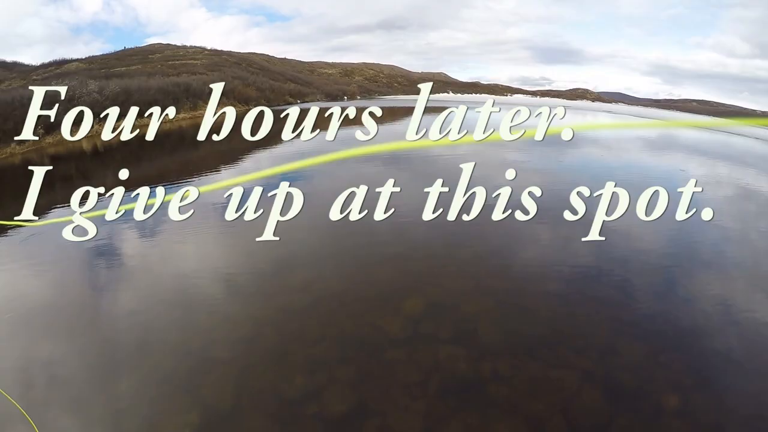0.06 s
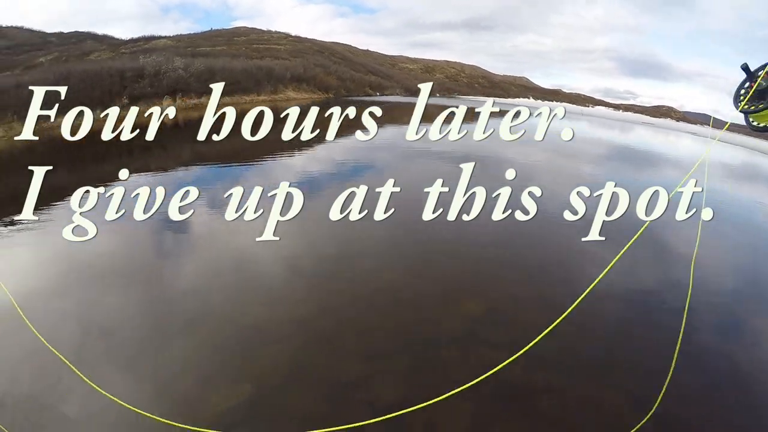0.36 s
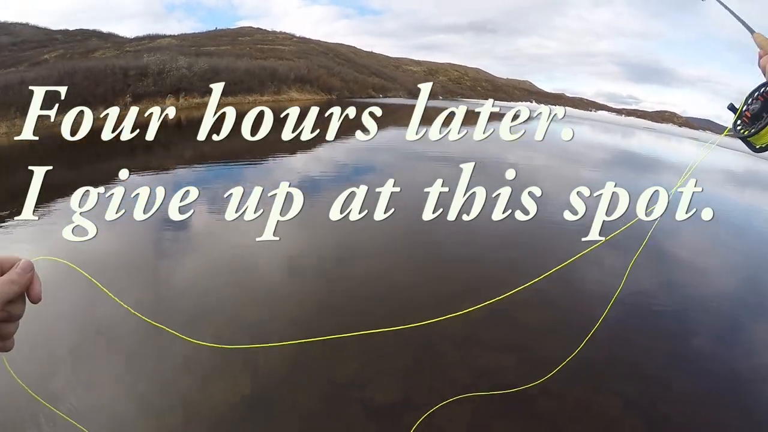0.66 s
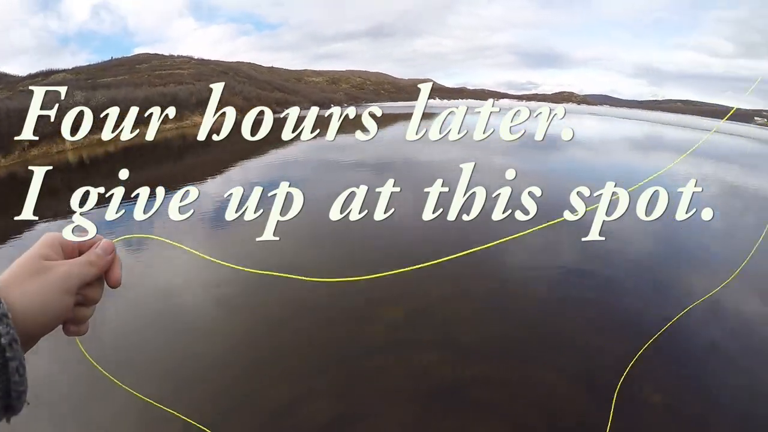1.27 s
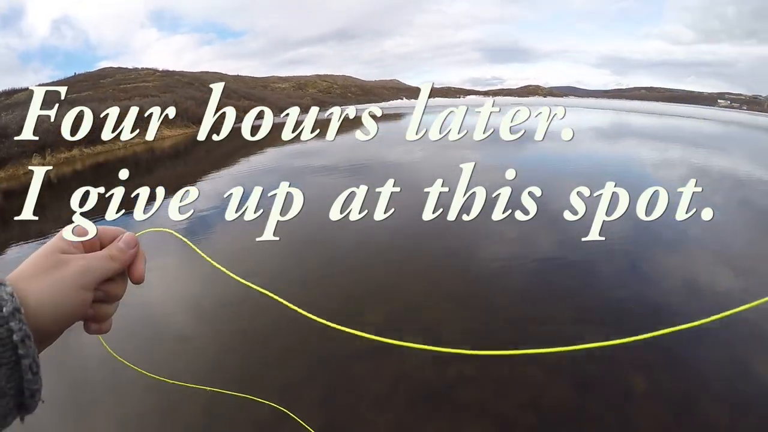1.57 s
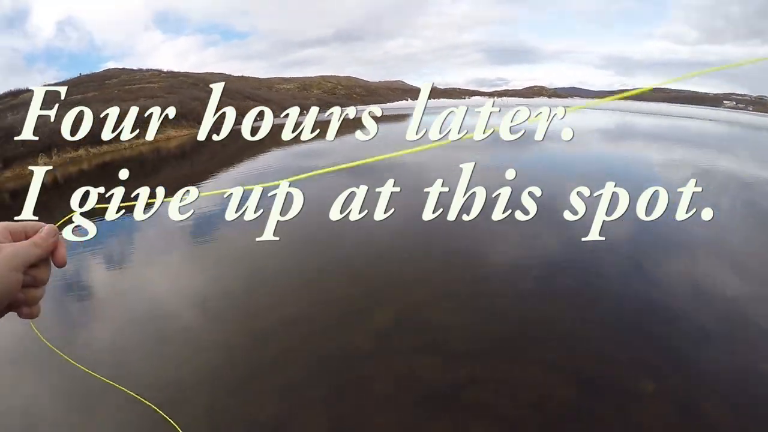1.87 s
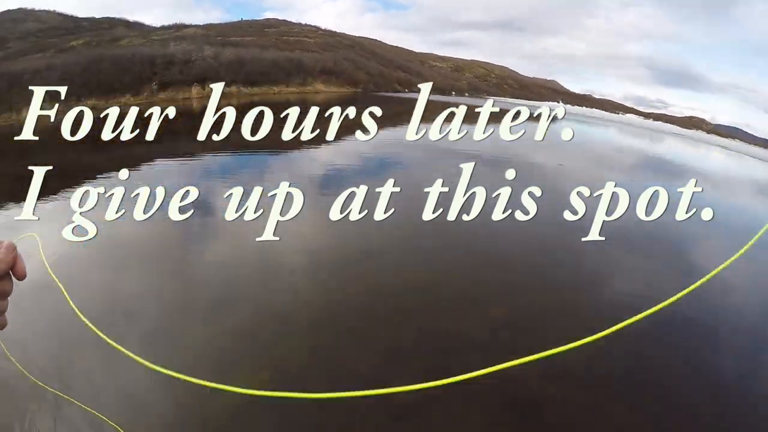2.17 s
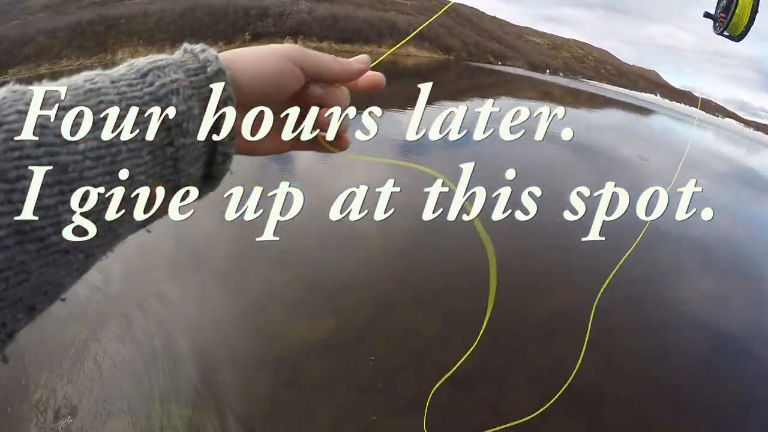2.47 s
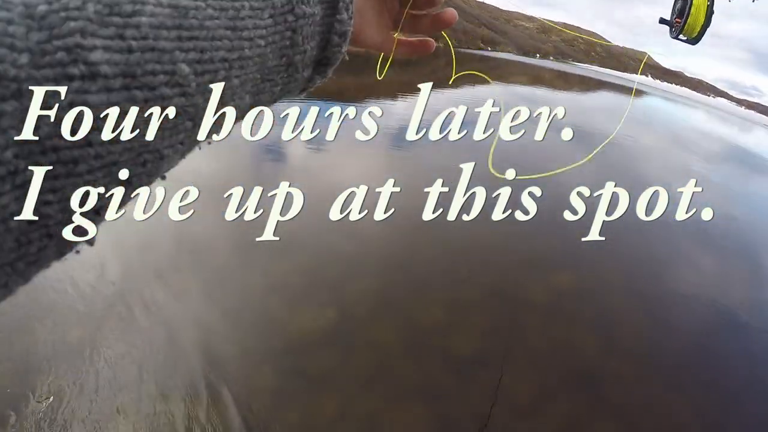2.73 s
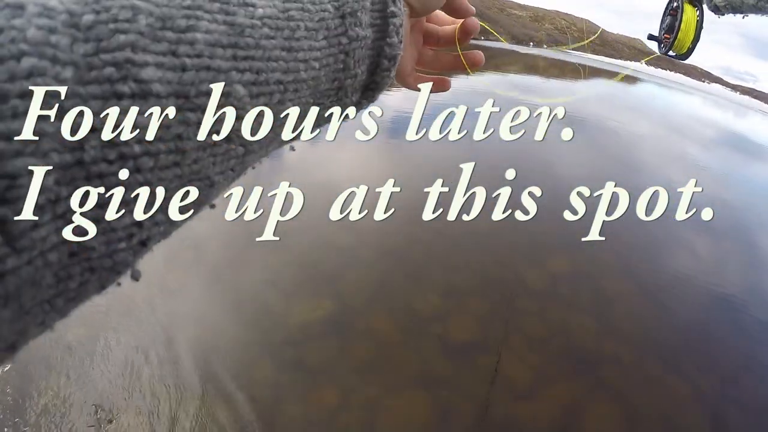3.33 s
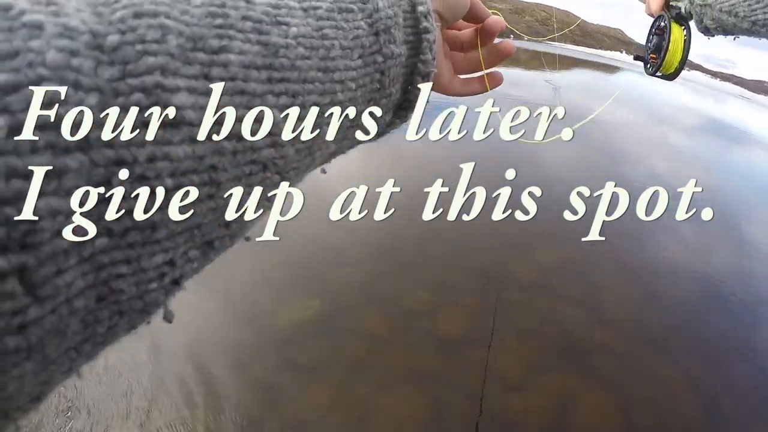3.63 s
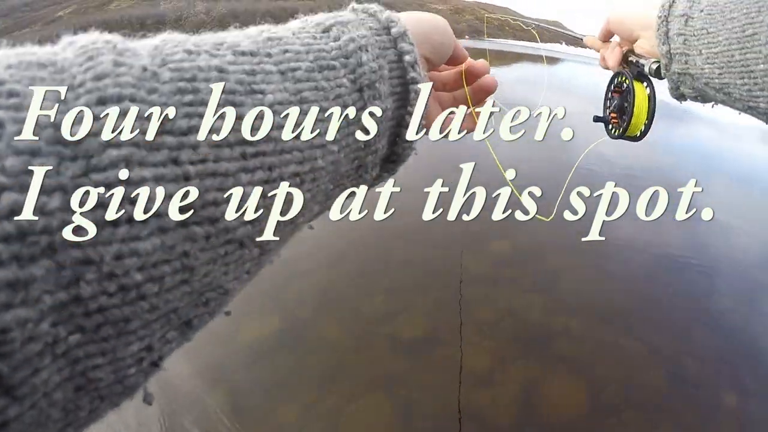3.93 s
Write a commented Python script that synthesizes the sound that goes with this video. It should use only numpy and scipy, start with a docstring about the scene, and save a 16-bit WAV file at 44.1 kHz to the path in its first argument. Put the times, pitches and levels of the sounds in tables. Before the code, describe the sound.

A fly fishing line is cast close by, over gusty wind rumble on the microphone. It slaps the rod at 0.2 seconds, the reel clicks at 0.6, and soft swishes lead to ticking through the rod rings around 1.5. At 2.3 comes a swish and the sharpest slap, then the line hisses out. A wool sleeve rustles from about 2.7, with faint water plops near 3.5.

```python
"""Fly cast on a lake shore

Heard from the angler's chest. The line swishes and sings in the air, is hauled ticking through the rod
rings, slaps the rod as it is let go and shoots out hissing; a woollen sleeve rustles. Wind buffets the
microphone, water plops and a far bird whistles. The left channel is almost dead."""
import sys
import numpy as np
from scipy import signal
from scipy.fft import rfft, irfft
from scipy.io import wavfile
from scipy.ndimage import uniform_filter1d

SR = 44100
rng = np.random.default_rng(int(sys.argv[2]) if len(sys.argv) > 2 else 0)


def generate_wav(sig):
    """Save sig (samples, or channels by samples) to the path in sys.argv[1] as 16-bit PCM at SR."""
    pcm = np.round(np.clip(np.atleast_2d(sig).T, -1, 1) * 32767).astype(np.int16)
    wavfile.write(sys.argv[1], SR, pcm)


N = 176400
T = np.arange(N) / SR
AGE = T[:SR // 10]  # time since an impact


def from_db(db):
    """Decibels to gain."""
    return 10 ** (np.asarray(db) / 20)


def unit_rms(x):
    """Scale to unit power."""
    return x / np.sqrt(np.mean(x ** 2) + 1e-20)


def level(curve, column=1):
    """Gain over time from one dB column of a curve."""
    curve = np.array(curve)
    return from_db(np.interp(T, curve[:, 0], curve[:, column]))


def colour(x, spectrum):
    """Shape a steady signal's spectrum; unit power."""
    hz, db = np.transpose(spectrum)
    bins_hz = np.fft.rfftfreq(N, 1 / SR) + 1e-3
    low_cut = 1 / np.sqrt(1 + (hz[0] / 2 / bins_hz) ** 4)
    gain = from_db(np.interp(np.log(bins_hz), np.log(hz), db))
    return unit_rms(irfft(rfft(x) * low_cut * gain, N))


def noise(spectrum):
    """Coloured noise; unit power."""
    return colour(rng.standard_normal(N), spectrum)


def wander(cutoff_hz):
    """Low-passed random drift; unit power."""
    return unit_rms(signal.sosfilt(signal.butter(2, cutoff_hz, fs=SR, output="sos"), rng.standard_normal(N)))


def swell(peak_s, rise_s, fall_s):
    """Gaussian envelope, separate widths before and after the peak."""
    return np.exp(-((T - peak_s) / np.where(T < peak_s, rise_s, fall_s)) ** 2 / 2)


def mode(hz, t60_s):
    """A struck, decaying resonance."""
    return np.sin(2 * np.pi * hz * AGE) * from_db(-60 * AGE / t60_s)


def glide(length_s, start_hz, hz_per_s):
    """Soft-edged tone with a linear pitch slide."""
    age = T[:int(length_s * SR)]
    return np.sin(2 * np.pi * (start_hz + hz_per_s * age / 2) * age) * signal.windows.tukey(len(age), .5)


def add(out, start_s, sound):
    """Mix a short sound in place."""
    i = int(start_s * SR)
    out[i:i + len(sound)] += sound[:N - i]


def grains(per_s, spread_db):
    """Random clicks of uneven size."""
    clicks = (rng.random(N) < per_s / SR) * rng.choice([-1, 1], N)
    return clicks * from_db(spread_db * np.minimum(rng.exponential(1, N), 3))


def friction(spectrum):
    """Stick-slip grains over a smooth hiss."""
    stick_slip = unit_rms(grains(per_s=1500, spread_db=8))
    return colour(0.48 * stick_slip + rng.standard_normal(N), spectrum)


def flicker(x, depth_db=1.6, rate_hz=14):
    """Shifting contact: each third of an octave swells and sinks on its own."""
    band = np.round(3 * np.log2(np.clip(np.fft.rfftfreq(N, 1 / SR), 600, 13000)))
    spectrum = rfft(x)
    return sum(irfft(spectrum * (band == k), N) * from_db(depth_db * wander(rate_hz))
               for k in np.unique(band))


# gust strength: time_s, rumble_relative_db, flutter_relative_db
GUSTS = [(0.0, -54.5, -79), (0.14, -69, -64), (0.19, -68, -60), (0.23, -49, -66), (0.27, -37, -57),
         (0.3, -46, -60), (0.34, -58, -82), (0.38, -42.5, -72), (0.44, -48.5, -62), (0.5, -55, -86),
         (0.65, -63, -96), (0.73, -51.5, -67), (0.8, -52, -58), (0.88, -54.5, -77.5), (1.1, -45.5, -62.5),
         (1.2, -48, -73), (1.35, -59, -67), (1.41, -48.5, -69.5), (1.54, -57.5, -82), (1.66, -52.5, -69),
         (1.77, -43.5, -76), (1.85, -62.5, -58.5), (1.88, -52, -68), (2.08, -48.5, -64), (2.12, -41, -55.5),
         (2.2, -47, -53.5), (2.27, -44, -71), (2.35, -62, -81), (2.47, -46, -62), (2.52, -59.5, -70),
         (2.67, -56.5, -82), (2.71, -44, -53), (2.85, -47, -56), (3.01, -52, -57.5), (3.06, -40, -54.5),
         (3.14, -53.5, -62.5), (3.27, -49, -71), (3.44, -46.5, -65), (3.52, -51.5, -70.5),
         (3.7, -48.5, -66), (3.78, -60.5, -91), (3.95, -47, -69), (4.0, -50.5, -76)]
# wind spectra: freq_hz, relative_db
RUMBLE_SPECTRUM = [(12, 0.5), (25, 2), (45, 0), (65, -7), (100, -19), (150, -38.5), (300, -48.5),
                   (3000, -120)]
FLUTTER_SPECTRUM = [(60, -9.5), (100, -1), (140, -4), (200, -13.5), (300, -23), (600, -85), (1500, -98),
                    (6000, -110)]


def wind(rumble_gain_db=8, flutter_gain_db=5.5, smoothing_s=0.0545, buffet_db=1.8, buffet_hz=12):
    """Lumpy pressure on the microphone port: gusts set its strength, eddies make it surge and sink."""
    out = np.zeros(N)
    layers = [(RUMBLE_SPECTRUM, rumble_gain_db), (FLUTTER_SPECTRUM, flutter_gain_db)]
    for column, (spectrum, gain_db) in enumerate(layers, start=1):
        eddies = noise(spectrum)
        local_rms = np.sqrt(uniform_filter1d(eddies ** 2, int(smoothing_s * SR)) + 1e-6)
        surge = from_db(gain_db + buffet_db * wander(buffet_hz))
        out += eddies / local_rms * surge * level(GUSTS, column)
    return out


# lake wash: freq_hz, relative_db
LAKE_SPECTRUM = [(100, 1.5), (300, 2.5), (800, 2.5), (1500, -3), (3000, -11), (6000, -17), (15000, -21)]


def lake(level_db=-69):
    """Steady wash of water."""
    return from_db(level_db) * noise(LAKE_SPECTRUM)


# haul envelope: time_s, level_db
HAUL_LEVEL = [(0, -69.5), (.17, -68.5), (.46, -63.5), (.62, -69.5), (.8, -77), (1.0, -68.5), (1.12, -68),
              (1.32, -61), (1.6, -56), (1.77, -60), (1.82, -66.5), (1.94, -70), (2.05, -65.5), (2.33, -59),
              (2.4, -97), (4, -71)]
# line on rings: freq_hz, relative_db
HAUL_SPECTRUM = [(400, 4), (1100, -0.5), (1600, 4), (2800, 1), (4000, -2.5), (6500, -5.5), (9000, -8.5),
                 (15000, -12.5)]


def haul():
    """Line rubs through the rod rings."""
    return level(HAUL_LEVEL) * friction(HAUL_SPECTRUM)


# sweeps through the air, at top speed: peak_s, rise_s, fall_s, level_db, pitch_hz
SWISHES = [(.42, .25, 0.38, -69.5, 970), (1.33, 0.15, 0.085, -63.5, 1150), (2.17, 0.18, 0.48, -67, 725),
           (2.336, 0.036, 0.037, -55.5, 603), (2.5, 0.057, 0.13, -58.5, 570),
           (3.58, 0.067, 0.95, -69.5, 650)]


def swishes(width_octaves=1, sag_octaves=0.47, flicker_db=4.5, flicker_hz=23):
    """Vortices shed by rod and line: louder and higher with speed."""
    power, weighted_octave = 1e-20, 0
    for peak_s, rise_s, fall_s, db, hz in SWISHES:
        speed = swell(peak_s, rise_s, fall_s)
        sweep_power = (speed * from_db(db)) ** 2
        power += sweep_power
        weighted_octave += sweep_power * (np.log2(hz) - sag_octaves * (1 - speed))
    centre_octave = weighted_octave / power
    out, weight_power = 0, 1e-20
    for hz in np.geomspace(180, 4000, 12):
        bandpass = signal.butter(2, [hz / 1.16, hz * 1.16], "band", fs=SR, output="sos")
        band = unit_rms(signal.sosfilt(bandpass, rng.standard_normal(N)))
        weight = 1 / (1 + ((np.log2(hz) - centre_octave) / width_octaves) ** 2)
        out += band * weight * from_db(flicker_db * wander(flicker_hz))
        weight_power += weight ** 2
    return out * np.sqrt(power / weight_power)


# line scuff: peak_s, rise_s, fall_s, level_db
SCUFF = (.18, .003, .0025, -48)
# scuff friction: freq_hz, relative_db
SCUFF_SPECTRUM = [(500, 10.5), (2000, -1), (3500, -5), (6700, 6), (9000, -9), (15000, -9)]


def scuff():
    """Line scuffs just before the first slap."""
    peak_s, rise_s, fall_s, db = SCUFF
    return from_db(db) * swell(peak_s, rise_s, fall_s) * friction(SCUFF_SPECTRUM)


# line on rod: start_s, crack_db, crack_cutoff_hz, rod_gain_db, thud_db, thud_hz
SLAPS = [(.183, -28.5, 10000, -35, -34.5, 261), (0.319, -54, 1800, -37, -42.5, 465),
         (1.078, -42, 920, -40.5, -53, 402), (1.383, -59, 890, -39, -43.5, 268),
         (2.3347, -22, 1700, -21.5, -74, 370)]
# rod modes: freq_hz, relative_db, t60_s
ROD_MODES = [(540, -11, 0.012), (803, -7, 0.012), (1000, -4, 0.0028), (1380, -12, 0.017),
             (1900, -19, 0.016), (2060, -24, 0.0076), (2540, -17, 0.0099), (3700, -25, 0.036),
             (4600, -23, 0.014), (6000, -21, 0.007), (10400, -27, 0.0068)]


def slaps(tail_db=-13.5, tail_t60_s=0.0048, thud_t60_s=0.049):
    """Line strikes the rod: a crack with a noisy tail, ringing modes and a thud."""
    out = np.zeros(N)
    rod = sum((-1) ** k * from_db(db) * mode(hz, t60_s) for k, (hz, db, t60_s) in enumerate(ROD_MODES))
    for start_s, crack_db, cutoff_hz, rod_db, thud_db, thud_hz in SLAPS:
        lowpass = signal.butter(1, cutoff_hz, fs=SR)
        contact = signal.lfilter(*lowpass, signal.unit_impulse(len(AGE)))
        tail = unit_rms(signal.lfilter(*lowpass, rng.standard_normal(len(AGE))))
        tail *= from_db(tail_db - 60 * AGE / tail_t60_s)
        crack = from_db(crack_db) * (contact / contact.max() + tail)
        thud = from_db(thud_db) * mode(thud_hz, thud_t60_s)
        add(out, start_s, crack + from_db(rod_db) * rod + thud)
    return out


# bubbles: start_s, level_db, start_hz, glide_hz_per_s, length_s
PLOPS = [(0.211, -57.5, 388, 4600, 0.081), (0.555, -58.5, 398, 905, 0.036),
         (1.914, -50.5, 1000, 7000, 0.0051), (3.336, -57, 632, 1210, 0.044), (3.501, -56, 540, 5860, 0.037),
         (3.594, -54.5, 490, 1000, 0.02)]


def plops():
    """Water plops at the bank; each bubble rises in pitch as it fades."""
    out = np.zeros(N)
    for start_s, db, hz, hz_per_s, length_s in PLOPS:
        bubble = glide(length_s, hz, hz_per_s)
        add(out, start_s, from_db(db) * bubble * np.linspace(1, .5, len(bubble)))
    return out


# single eddies: centre_s, peak_db, width_s
PUFFS = [(0.275, -28.5, 0.0027), (0.299, -29, 0.0028), (0.8, -33, 0.0024), (1.107, -37.5, 0.005),
         (1.85, -31.5, 0.0039), (2.133, -28.5, 0.0034), (2.726, -34, 0.0016), (2.77, -38.5, 0.0022),
         (2.861, -32, .003), (3.065, -26.5, 0.0032), (3.349, -39.5, 0.0024), (3.429, -32.5, 0.0024)]


def puffs():
    """Each eddy thumps the microphone port: a push, then a pull."""
    return sum(from_db(db) * (centre_s - T) / width_s * np.exp(.5) * swell(centre_s, width_s, width_s)
               for centre_s, db, width_s in PUFFS)


# line tones: start_s, length_s, level_db, start_hz, glide_hz_per_s
LINE_TONES = [(0.37, 0.13, -63, 1343, -2400), (0.402, 0.096, -74, 1900, 5503),
              (1.294, 0.052, -57.5, 1790, 897), (2.264, 0.11, -51.5, 301.7, 901),
              (2.296, 0.089, -50.5, 672.5, 1002), (2.35, 0.049, -62, 10660, -45000),
              (2.458, 0.075, -54.5, 375, 1198)]


def singing(width_hz=80):
    """Narrow, unsteady tones of the line: aeolian singing of the taut line, and a thin falling whistle as it
    slips off the fingers at 2.35 s."""
    out = np.zeros(N)
    for start_s, length_s, db, hz, hz_per_s in LINE_TONES:
        add(out, start_s, from_db(db) * glide(length_s, hz, hz_per_s))
    return out * wander(width_hz)


# line on a ring: start_s, knock_peak_db, low_hz, high_hz, edge_relative_db
TICKS = [(0.54, -49, 1000, 3500, -14), (0.597, -46, 1600, 3280, -18), (1.4524, -33.5, 1050, 3440, -8),
         (1.573, -42, 1600, 4130, -15), (1.611, -40.5, 1900, 3600, -12), (1.6673, -35, 1760, 3400, -26),
         (1.7153, -42, 1900, 3480, -22), (1.7316, -36, 1900, 3930, -6), (1.7633, -35, 1550, 3050, -32),
         (2.4052, -35, 3300, 5700, -6), (2.703, -45, 1500, 5500, -16)]


def ticks(edge_t60_s=0.002):
    """Line taps a ring: a dry, band-limited knock with a hard edge of noise."""
    out = np.zeros(N)
    for start_s, db, low_hz, high_hz, edge_db in TICKS:
        highpass = signal.butter(2, low_hz, "high", fs=SR, output="sos")
        lowpass = signal.butter(8, high_hz, fs=SR, output="sos")
        knock = signal.sosfilt(np.vstack([highpass, lowpass]), signal.unit_impulse(len(AGE)) + 1e-18)
        edge = rng.standard_normal(len(AGE)) * from_db(edge_db - 60 * AGE / edge_t60_s)
        add(out, start_s, from_db(db) * (knock / np.abs(knock).max() + edge))
    return out


# reel snap: start_s, level_db
SNAPS = [(0.575, -26), (0.5755, -34)]
# snap before its low cut: freq_hz, relative_db
SNAP_SPECTRUM = [(3000, -36), (5500, -25), (7300, -10), (8400, -14), (9800, 3), (11300, -6), (12200, 4),
                 (15000, 3)]


def reel_snap(t60_s=0.0049, low_cut_hz=6500):
    """Hard little snap at the reel: bright, fast-decaying noise."""
    out = np.zeros(N)
    highpass = signal.butter(2, low_cut_hz, "high", fs=SR)
    for start_s, db in SNAPS:
        burst = noise(SNAP_SPECTRUM)[:len(AGE)] * from_db(db - 60 * AGE / t60_s)
        add(out, start_s, signal.lfilter(*highpass, burst))
    return out


# bird notes: start_s, length_s, level_db, start_hz, glide_hz_per_s
WHISTLES = [(.765, .25, -75, 4470, -200), (1.29, .175, -65.5, 3780, 750)]


def bird(waver_depth=.2, waver_hz=40):
    """Far gliding whistles, wavering in level."""
    out = np.zeros(N)
    for start_s, length_s, db, hz, hz_per_s in WHISTLES:
        add(out, start_s, from_db(db) * glide(length_s, hz, hz_per_s))
    return out * (1 + waver_depth * wander(waver_hz))


# finger slips: peak_s, rise_s, fall_s, level_db
SLIPS = [(1.31, .025, .035, -69), (2.38, .022, .07, -56.5)]
# line on fingers: freq_hz, relative_db
SLIP_SPECTRUM = [(5000, -21), (8000, -6), (10000, 2.5), (12500, -1), (15000, -8)]


def slips():
    """Line slips off the fingers with a thin hiss."""
    envelope = sum(from_db(db) * swell(peak_s, rise_s, fall_s) for peak_s, rise_s, fall_s, db in SLIPS)
    return envelope * friction(SLIP_SPECTRUM)


# shoot envelope: time_s, level_db
SHOOT_LEVEL = [(2.33, -79), (2.355, -57), (2.41, -54.5), (2.5, -55), (2.6, -56.5), (2.7, -57),
               (2.76, -66.5), (3, -73)]
# running line and loose coils: freq_hz, relative_db
SHOOT_SPECTRUM = [(200, 0.5), (700, 1.5), (1200, 1), (1700, 3.5), (2400, 1.5), (3000, -2), (4200, 1.5),
                  (5800, 0.5), (7400, -5.5), (10000, -5.5), (12500, -6), (15000, -13)]
CRACKLE_SPECTRUM = [(300, 11.5), (800, 6), (2000, 6), (5000, -7), (12000, -28)]


def shoot():
    """Friction hiss of loose line shooting out."""
    return level(SHOOT_LEVEL) * friction(SHOOT_SPECTRUM)


def coil_crackle(relative_db=-5.5):
    """Loose coils crackle as they leave the hand."""
    crackle = colour(grains(per_s=59, spread_db=2.5), CRACKLE_SPECTRUM)
    return from_db(relative_db) * level(SHOOT_LEVEL) * crackle


# sleeve envelope: time_s, level_db
SLEEVE_LEVEL = [(2.3, -90), (2.55, -65), (2.75, -63), (2.87, -60), (3.05, -60.5), (3.2, -61.5),
                (3.42, -63.5), (3.52, -66.5), (3.72, -66), (3.79, -61.5), (4, -67.5)]
# wool on wool: freq_hz, relative_db
SLEEVE_SPECTRUM = [(250, 8.5), (700, 6), (1400, -4.5), (2300, 5), (3300, 0.5), (5500, 1), (7500, -3),
                   (12500, -5.5), (15000, -11)]


def sleeve():
    """Wool rubs as the arm reaches forward."""
    return level(SLEEVE_LEVEL) * friction(SLEEVE_SPECTRUM)


# friction resonances: peak_s, rise_s, fall_s, pitch_hz, level_db
ZINGS = [(2.51, 0.064, .09, 10000, -64), (2.8, 0.13, .15, 4400, -66), (2.9, 0.11, .25, 5200, -69.5),
         (3.2, 0.26, .22, 5700, -74), (2.8, .15, .3, 2100, -80), (3.0, 0.13, .25, 8500, -77),
         (2.7, 0.17, 0.33, 14000, -77)]


def zings(width_hz=260):
    """Friction excites narrow resonances, each swelling in its turn."""
    return sum(from_db(db) * swell(peak_s, rise_s, fall_s) * wander(width_hz) * np.sin(2 * np.pi * hz * T)
               for peak_s, rise_s, fall_s, hz, db in ZINGS)


# touches on the first ring: start_s, gain_db
RATTLES = [(2.565, -56), (2.568, -37.5), (2.5693, -54), (2.5724, -40)]
# ring modes: freq_hz, relative_db, t60_s
RING_MODES = [(1790, -3, 0.051), (2680, -8, 0.017), (3430, -5.5, 0.021), (5160, -4, 0.012),
              (9400, -16, 0.0056)]


def rattle(scrape_db=-7, scrape_t60_s=0.048, scrape_cutoff_hz=4940):
    """Line rattles the first ring: each touch strikes its modes and adds a dry scrape."""
    out = np.zeros(N)
    lowpass = signal.butter(2, scrape_cutoff_hz, fs=SR)
    for start_s, gain_db in RATTLES:
        ringing = sum(from_db(db + rng.normal()) * mode(hz, t60_s) for hz, db, t60_s in RING_MODES)
        scrape = unit_rms(signal.lfilter(*lowpass, rng.standard_normal(len(AGE))))
        scrape *= from_db(scrape_db - 60 * AGE / scrape_t60_s)
        add(out, start_s, from_db(gain_db) * (ringing + scrape))
    return out


def scene(left_gain_db=-29.5, left_cutoff_hz=194):
    """Everything reaches the right channel; the left gets only a dull trace."""
    air = wind() + swishes() + puffs() + singing()
    rubbing = flicker(haul() + shoot() + sleeve()) + scuff() + slips() + coil_crackle() + zings()
    impacts = slaps() + ticks() + reel_snap() + rattle()
    shore = lake() + plops() + bird()
    right = air + rubbing + impacts + shore
    left = from_db(left_gain_db) * signal.lfilter(*signal.butter(1, left_cutoff_hz, fs=SR), right)
    return np.array([left, right])


# channel hiss: freq_hz, relative_db
LEFT_HISS_SPECTRUM = [(60, 17), (150, 11), (400, 1.5), (1000, -1), (6000, 0), (12000, 1.5), (15000, 0)]
RIGHT_HISS_SPECTRUM = [(100, 9), (1000, -4.5), (6000, -2.5), (12000, 1), (15000, -4.5)]


def record(dry, left_hiss_db=-69.5, right_hiss_db=-71.5, cutoff_hz=15400):
    """Separate hiss on each channel, then a steep treble cut."""
    hiss = np.array([from_db(left_hiss_db) * noise(LEFT_HISS_SPECTRUM),
                     from_db(right_hiss_db) * noise(RIGHT_HISS_SPECTRUM)])
    lowpass = signal.ellip(10, .1, 70, cutoff_hz, fs=SR, output="sos")
    return signal.sosfilt(lowpass, dry + hiss)


dry = scene()
out = record(dry)
generate_wav(out)
```